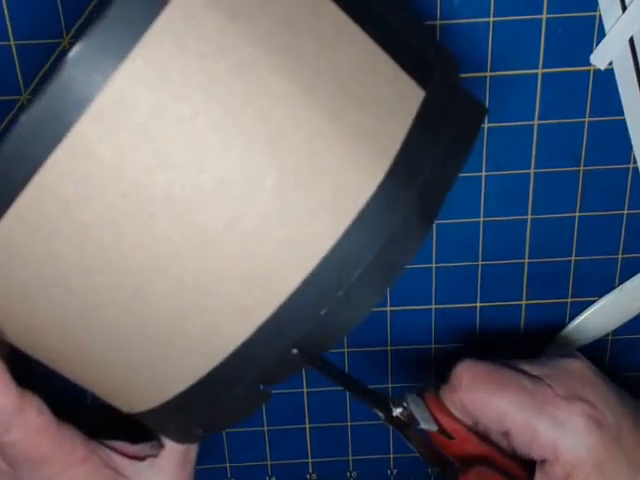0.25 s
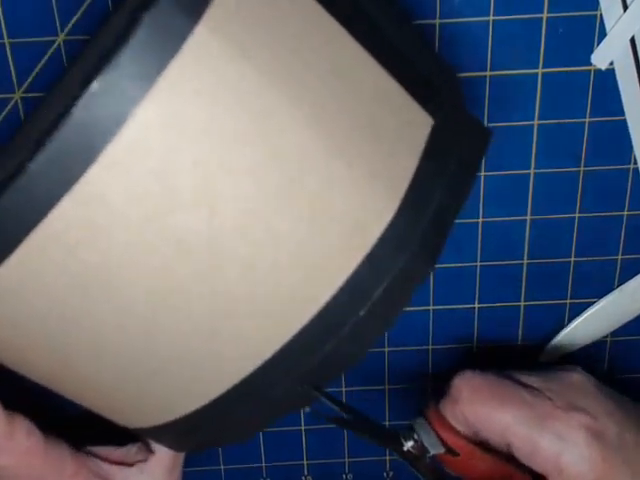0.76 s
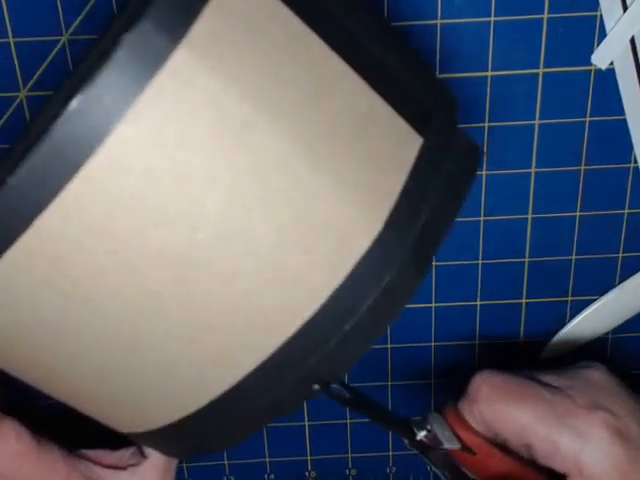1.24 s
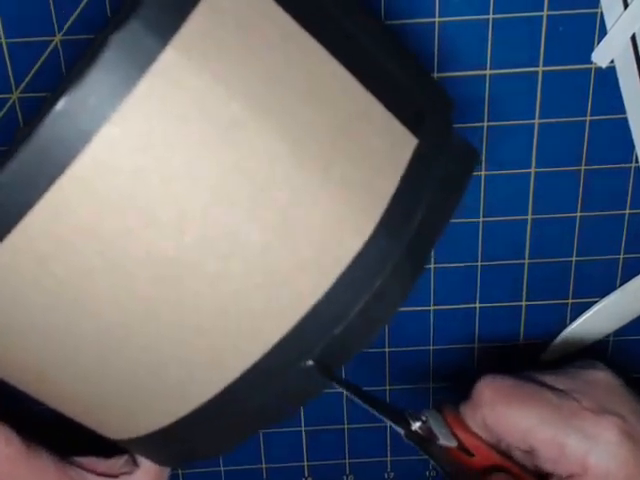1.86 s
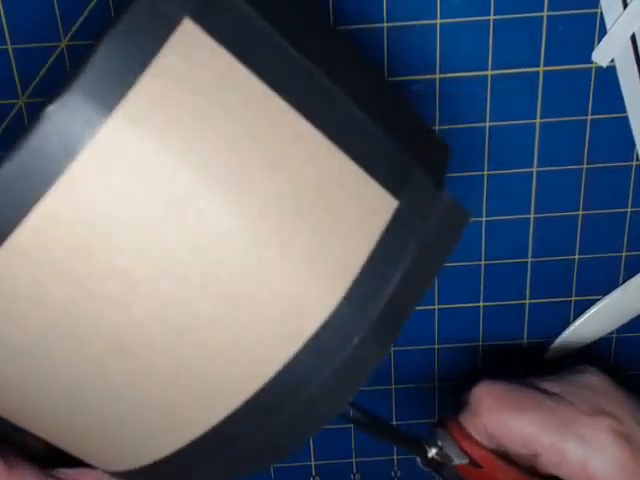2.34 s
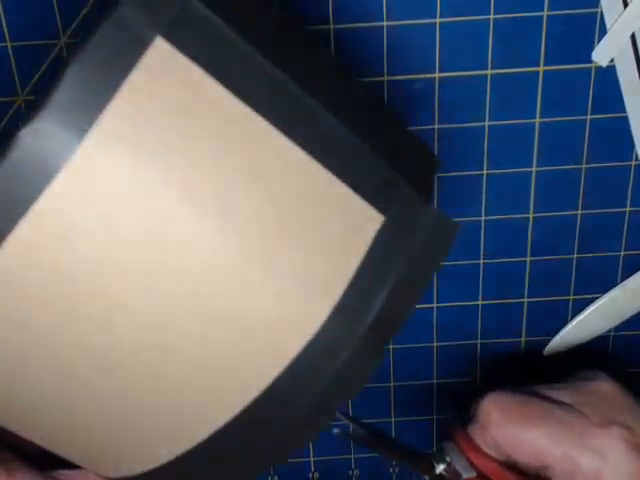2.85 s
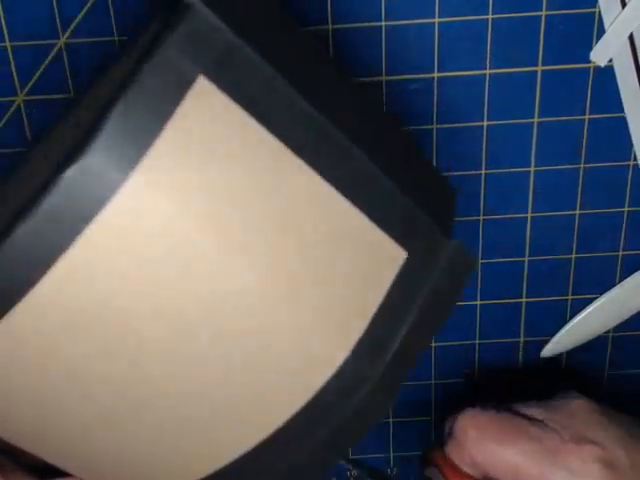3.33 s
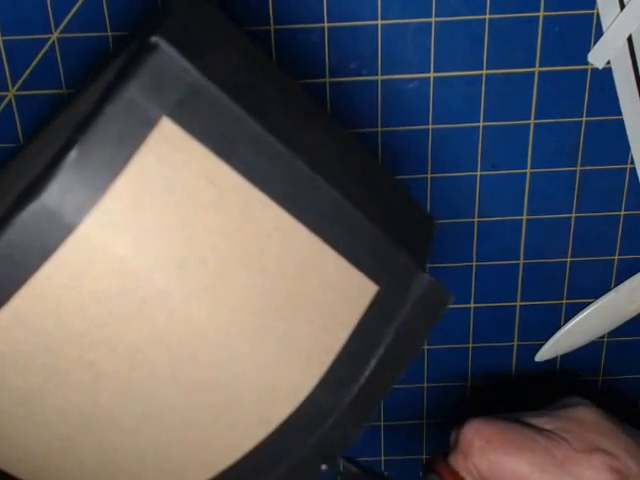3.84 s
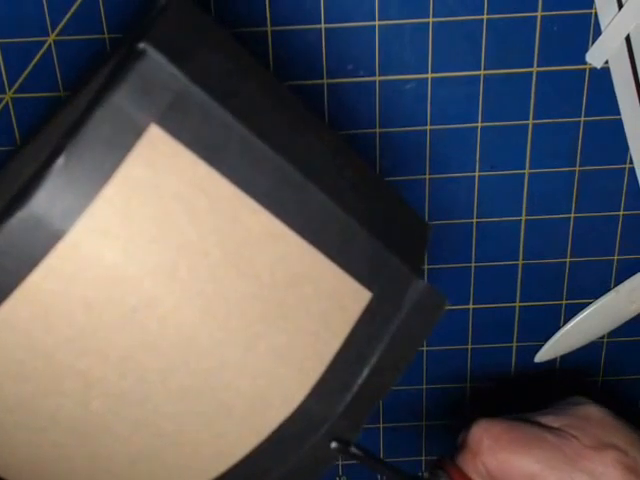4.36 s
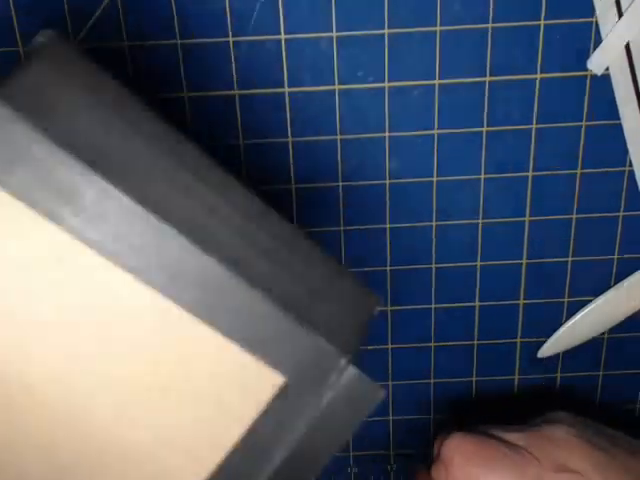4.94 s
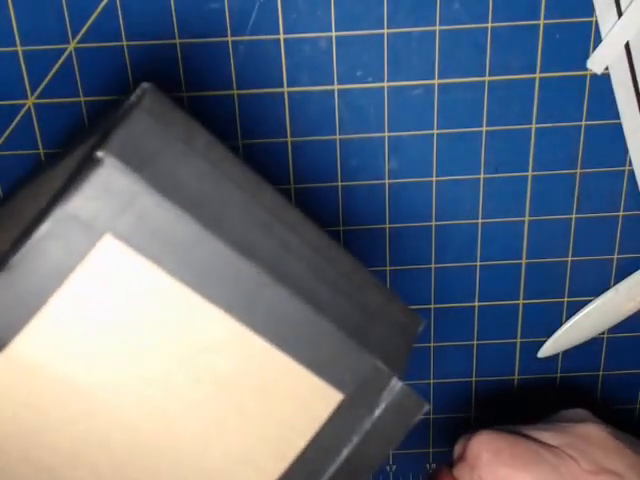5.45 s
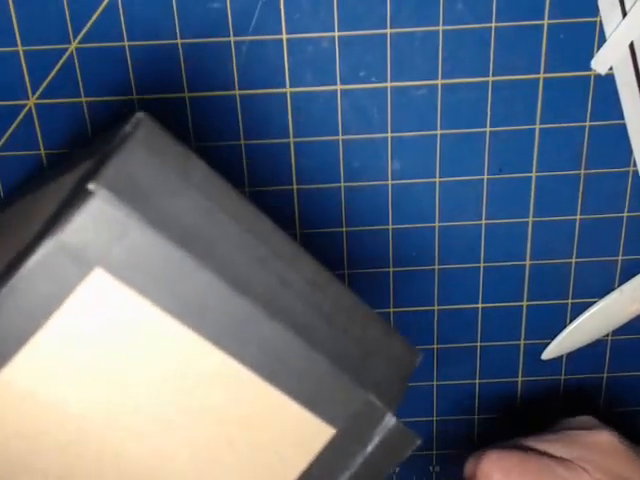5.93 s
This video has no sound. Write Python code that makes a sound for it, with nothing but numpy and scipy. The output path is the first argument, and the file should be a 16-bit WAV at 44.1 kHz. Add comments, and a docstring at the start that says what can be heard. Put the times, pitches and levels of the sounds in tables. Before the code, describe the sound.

A card box is trimmed with small scissors on a table. Each brief cut bites with a knock, crunches harder, then snaps through; the blades hiss apart and clatter metallically. Soft rubs, papery ticks and hollow bumps fill the gaps, busiest before the fourth and fifth cuts. The sound is close and slightly dull on top, with short reflections, light room noise and spells of faint rumble.

```python
"""Trimming a card box with small scissors

Close to a narrow-band microphone in a small room, five snips crunch through the card over a cutting mat.
Random fibre snaps shake card resonances, and each break-through snaps and knocks the box.
The blades then slide open as fine-grained friction and clack as a blow on the steel's resonances.
Between the cuts, fingers shift the box: slips groan in its walls, soft pushes knock it and the edge crackles.
Behind lie coloured room noise, a faint hum, spells of rumble and decaying-noise reflections."""
import sys
import numpy as np
from scipy import signal
from scipy.fft import rfft, irfft, next_fast_len
from scipy.io import wavfile
from scipy.ndimage import uniform_filter1d

SR = 44100
rng = np.random.default_rng(int(sys.argv[2]) if len(sys.argv) > 2 else 0)


def persist_wave(psi):
    """Save psi, clipped to +-1, as 16-bit WAV."""
    counts = np.round(np.clip(psi, -1, 1) * 32767).astype(np.int16)
    wavfile.write(sys.argv[1], SR, np.atleast_2d(counts).T)


N = 272977
TIME = np.arange(N) / SR
BLOW_TIME = TIME[:SR // 5]
LEAD_S = .01  # room ahead of each blow for the surfaces to graze
RUB_ATTACK_SHARE = 0.3  # share of a rub or crackle that lies before its crest

# The five snips: bite, crunch and break-through. Each row: bite in seconds, its level in dB, its pitch in Hz,
# crunch start in seconds, its level in dB, its treble in dB, groan of the wall in dB,
# break-through in seconds, snap in dB, knock in dB, knock pitch in Hz, low thud in dB,
# ring of the cut strip in Hz, ring of the loaded edge in Hz.
SNIPS = [(0.5206, -29, 651, .526, -38.5, -5, -46.5, .5735, -28.5, -24, 631, -5, 2473, 6640),
         (1.730, -32, 684, 1.742, -41.5, -7, -47.5, 1.8125, -28.5, -31, 649, -12, 2790, 6620),
         (3.063, -45.5, 1164, 3.101, -40.5, 0.5, -46, 3.1385, -30.5, -29.5, 847, -5, 2190, 5246),
         (4.533, -33, 1246, 4.542, -40, -3, -39.5, 4.5912, -23, -31, 696, -1, 1300, 6060),
         (5.69, -37, 1150, 5.700, -46, -1, -44.5, 5.7570, -21.5, -36, 953, 5.5, 3670, 7100)]
# Resonances of the scissors. Each row: pitch in Hz, width in Hz, level in dB.
SCISSOR_MODES = [(516, 250, -7), (868.4, 270, -3.5), (1100, 120, -5), (1946, 210, 0), (2330, 160, -2),
                 (2960, 270, -3), (3206, 450, -1.5), (3700, 310, -3.5), (4600, 250, -14.5),
                 (4920, 160, -4.5), (5780, 320, -7), (7500, 1300, -6.5)]


def from_db(db):
    """Turn decibels into an amplitude factor."""
    return 10 ** (np.asarray(db) / 20)


def rms_one(x):
    """Scale a sound to rms 1."""
    return x / np.sqrt(np.mean(x ** 2) + 1e-20)


def blow_one(x):
    """Scale a blow to the energy of 3 ms at level 1."""
    return x / np.sqrt(np.sum(x ** 2) / (.003 * SR) + 1e-20)


def at_hz(points, hz):
    """Read a table on a log-frequency axis."""
    points = np.array(points)
    return np.interp(np.log(np.maximum(hz, 1)), np.log(points[:, 0]), points[:, 1])


def add(out, s, sound):
    """Mix a sound in at a given time."""
    start = max(round(s * SR), 0)
    out[start:start + len(sound)] += sound[:N - start]


def cut(x, hz, kind, order=2):
    """Butterworth filter."""
    return signal.sosfilt(signal.butter(order, hz, kind, fs=SR, output="sos"), x)


def resonate(x, hz, width_hz):
    """One resonance, gain 1 on top."""
    r = np.exp(-np.pi * width_hz / SR)
    zeros = np.array([1, 0, -1]) * (1 - r * r) / 2
    poles = [1, -2 * r * np.cos(2 * np.pi * hz / SR), r * r]
    return signal.lfilter(zeros, poles, x + 1e-18)


def body(x, modes):
    """Parallel resonances with alternating signs."""
    return sum((-1) ** k * from_db(db) * resonate(x, hz, width) for k, (hz, width, db) in enumerate(modes))


def drift(rate):
    """Smooth chance, changing about so many times a second; spread 1."""
    steps = rng.standard_normal(4000)
    return rms_one(np.interp(TIME * rate, np.arange(len(steps)), steps))


def shifting_body(x, modes, shift_db, shifts_per_s):
    """The contact point travels, so each resonance is fed now more, now less."""
    out = np.zeros(N)
    for k, (hz, width, db) in enumerate(modes):
        feed = from_db(db + shift_db * drift(shifts_per_s))
        out += (-1) ** k * feed * resonate(x, hz, width)
    return out


def colour(x, spectrum):
    """Give a steady noise a spectrum; rms 1."""
    size = next_fast_len(N)
    hz = np.arange(size // 2 + 1) * SR / size
    return rms_one(irfft(rfft(x, size) * from_db(at_hz(spectrum, hz)), size)[..., :N])


def grains(per_s, spread_db):
    """Tiny slips or fractures at random moments with random signs, uneven in size unless the spread is 0."""
    sizes = from_db(spread_db * np.minimum(rng.exponential(1, N), 4)) * rng.choice([-1, 1], N)
    return sizes * (rng.random(N) < per_s / SR)


def even(x, window_s):
    """Hold the running level near 1 and keep the fine grain; a floor spares the quietest stretches."""
    power = uniform_filter1d(x ** 2, max(int(window_s * SR), 2))
    return x / np.sqrt(np.maximum(power, 0) + np.mean(x ** 2) / 10 ** 2)


def stroke(start, crest, end, depth_db):
    """Samples and gain of a movement that swells and dies away."""
    span = slice(int(start * SR), int(end * SR))
    away = np.abs(np.interp(TIME[span], [start, crest, end], [-1, 0, 1]))
    return span, from_db(-depth_db * away ** 1.13) * np.minimum(1, 10 * (1 - away))


def contact(chatter, build_s, t60):
    """A blow at LEAD_S: the surfaces graze as they meet, hit once, and chatter to rest."""
    t = BLOW_TIME - LEAD_S
    force = chatter * rng.standard_normal(len(t)) * from_db(-60 * np.maximum(-t / build_s, t / t60))
    force[round(LEAD_S * SR)] += 1
    return force


def pan(x, left_db):
    """Place a sound; left_db is the left channel's lead over the right."""
    return x * from_db([[left_db / 2], [-left_db / 2]])


def air(level_db=-68, side_db=-12, rumble_hz=55, rumble_width_hz=45, rumble_side_db=-10, waver_db=0.5):
    """Gently wavering room noise and a faint hum over a rumble that comes and goes."""
    # Room air. Each row: pitch in Hz, relative level in dB per Hz.
    air_spectrum = [(20, -37.5), (60, -25.5), (110, -13.5), (170, -1), (290, -3), (550, -7), (800, -11),
                    (1250, -17.5), (1600, -15), (2500, -16), (2800, -22.5), (3100, -31), (3450, -30.5),
                    (3700, -27), (4150, -27.5), (4550, -34), (5150, -29), (5600, -28.5), (6150, -32.5),
                    (6700, -27.5), (7400, -38.5), (9000, -41)]
    # Left-right difference of the air. Each row: pitch in Hz, dB against the middle (before rms scaling).
    side_tilt = [(80, -11.5), (250, -6.5), (700, -24), (2500, -20.5), (5000, -24)]
    # Spells of low rumble. Each row: start in seconds, end in seconds, level in dB.
    rumble_spells = [(1.459, 1.768, -81), (2.502, 4.499, -85)]
    # Faint steady hum and whine. Each row: pitch in Hz, level in dB.
    hum_tones = [(177.6, -87), (1717, -90), (2315, -90.5), (3628, -88.5), (4118, -96)]
    rumble_fade_s, rumble_rest_db = 0.16, -107
    opposite = np.array([[1], [-1]])

    mid = colour(rng.standard_normal(N), air_spectrum) * from_db(waver_db * drift(8.3))
    side_spectrum = [(hz, db + at_hz(side_tilt, hz)) for hz, db in air_spectrum]
    side = colour(rng.standard_normal(N), side_spectrum)
    noise = from_db(level_db) * (mid + from_db(side_db) * side * opposite)

    deep = resonate(rng.standard_normal((2, N)), rumble_hz, rumble_width_hz)
    low_mid, low_side = rms_one(cut(deep, 90, "low"))
    swell = from_db(rumble_rest_db)
    for start, end, db in rumble_spells:
        inside = np.minimum(TIME - start, end - TIME)
        swell = swell + from_db(db) * np.clip(1 + inside / rumble_fade_s, 0, 1)
    rumble = swell * (low_mid + from_db(rumble_side_db) * low_side * opposite)

    hum = sum(from_db(db) * np.sqrt(2) * np.sin(2 * np.pi * hz * TIME) for hz, db in hum_tones)
    return noise + rumble + hum


def room(x, near_db=-12, near_t60=0.055, far_db=-15, box_db=3, box_hz=900):
    """Quick reflections off table and box, then the room's tail, as noise decaying at its own rate in each band."""
    # Room reverberation time. Each row: pitch in Hz, time to fall by 60 dB in seconds.
    tail_t60 = [(150, 1), (500, 1), (1200, 0.34), (2600, 0.14), (4500, 0.22), (7000, 0.041)]
    # Strength of the room tail. Each row: pitch in Hz, level in dB.
    tail_level = [(150, -1), (600, -17), (1400, -5), (2500, 3), (4200, -7.5), (7000, -12.5)]
    # Left-right difference in reflected sound. Each row: pitch in Hz, level in dB.
    spread = [(80, -8), (300, -14), (700, -4), (1500, -7), (2700, -15), (7000, -18)]
    t, response = TIME[:SR // 2], 0
    edges = np.geomspace(80, 10000, 9)
    for low, high in zip(edges, edges[1:]):
        hz = np.sqrt(low * high)
        near = from_db(-60 * t / near_t60) * (t > .003)
        near *= from_db(near_db + box_db * (hz < box_hz)) / np.linalg.norm(near)
        far = from_db(-60 * t / at_hz(tail_t60, hz)) * (t > .006)
        far *= from_db(far_db + at_hz(tail_level, hz)) / np.linalg.norm(far)
        noise = rng.standard_normal((2, len(t))) * np.hypot(near, far)
        response = response + cut(noise, [low, high], "band") * from_db([[0], [at_hz(spread, hz)]])
    mid, side = signal.fftconvolve(x[None], response, axes=1)[:, :N]
    return mid + side * [[1], [-1]]


def all_rubs():
    """Rubs swell quickly and fade slowly; the wall also groans against the blades all through each snip."""
    # Card rubbing on fingers and blades. Each row: crest in seconds, length in seconds, crest level in dB,
    # pitch in Hz, dry rasp in dB.
    rub_rows = [(0.243, 0.057, -43.5, 676, -36), (0.381, 0.053, -53.5, 850, -14),
                (0.705, 0.047, -50, 668, 4), (1.36, 0.16, -48.5, 660, -27), (2.632, 0.042, -49, 860, -21.5),
                (2.918, 0.089, -50, 610, -14), (3.304, 0.067, -48, 746, -8.5),
                (3.8, 0.066, -40.5, 693, -22), (3.825, 0.049, -41.5, 694, -2.5),
                (3.846, 0.068, -43.5, 652, -28), (3.892, 0.05, -39, 682, -25),
                (3.921, 0.064, -49, 660, -5.5), (4.153, 0.14, -50, 640, -17), (4.266, 0.057, -54, 613, -13),
                (4.528, 0.031, -36, 853, -3.5), (4.703, 0.048, -38, 1375, -19.5),
                (5.171, 0.036, -45, 664, -9), (5.228, 0.19, -49, 595, -22.5), (5.328, 0.058, -49, 716, -27),
                (5.545, 0.054, -54.5, 735, -25), (5.582, 0.04, -44, 716, -25.5),
                (5.653, 0.051, -50.5, 656, -33), (5.684, 0.044, -41.5, 842, -13.5),
                (5.904, 0.072, -46, 1273, -25)]
    groan_hz, groan_rasp_db, groan_crest_share = 753, -8.5, 0.75
    groan_lead_s, groan_tail_s = 0.037, 0.041
    rows = []
    for s, length, db, hz, rasp_db in rub_rows:
        start = s - RUB_ATTACK_SHARE * length
        rows.append((start, s, s + (1 - RUB_ATTACK_SHARE) * length, db, hz, rasp_db))
    for bite, _, _, _, _, _, db, through, *_ in SNIPS:
        crest = bite + groan_crest_share * (through - bite)
        rows.append((bite - groan_lead_s, crest, through + groan_tail_s, db, groan_hz, groan_rasp_db))
    return rows


def rubs(slips_per_s=900, crackles_per_s=300, width_share=0.27, skirt_share=0.65, judder_db=2.5,
         overtone=1.7, overtone_db=-11):
    """Stick and slip make a wall groan in short swells at its own pitch, with a dry rasp from the card's surface."""
    # Resonances of the rubbed card surface. Each row: pitch in Hz, width in Hz, level in dB.
    rasp_modes = [(1170, 220, 7), (1500, 260, 7), (2420, 170, 4), (2980, 260, 0), (5360, 250, -15),
                  (6220, 260, -14)]
    out = np.zeros(N)
    slips = cut(grains(slips_per_s, spread_db=2.0), 230, "high")
    snags = cut(grains(crackles_per_s, spread_db=4.5), 260, "high")
    surface = rms_one(slips) + rms_one(snags)
    rasp = rms_one(shifting_body(surface, rasp_modes, shift_db=3, shifts_per_s=50))
    judder = from_db(judder_db * drift(170))
    for start, crest, end, db, hz, rasp_db in all_rubs():
        span, gain = stroke(start, crest, end, depth_db=25.0)
        wall = 0
        for pitch, level in [(hz, 0), (overtone * hz, overtone_db)]:
            peak = resonate(slips[span], pitch, width_share * hz)
            wall = wall + from_db(level) * resonate(peak, pitch, skirt_share * hz)
        groan = judder[span] * even(wall, window_s=0.014)
        out[span] += from_db(db) * gain * (groan + from_db(rasp_db) * rasp[span])
    return out


def crackles(ticks_per_s=700, width_hz=700):
    """A short flurry of tiny, bright ticks as the paper's edge bends."""
    # Dry crackles of the edge under the fingers. Each row: crest in seconds, length in seconds,
    # crest level in dB, pitch in Hz.
    crackle_rows = [(0.246, 0.084, -73, 4170), (0.247, 0.052, -72.5, 6740), (0.376, 0.09, -65, 2130),
                    (0.383, .05, -71.5, 6600), (2.629, 0.033, -67.5, 4100), (2.630, 0.022, -69.5, 6390),
                    (2.737, 0.057, -75.5, 6660), (2.93, 0.041, -67.5, 7070), (3.674, 0.091, -74, 6120),
                    (4.041, .09, -75.5, 4220), (5.8297, 0.032, -53, 6960)]
    out, ticks = np.zeros(N), grains(ticks_per_s, spread_db=2.5)
    for s, length, db, hz in crackle_rows:
        start, end = s - RUB_ATTACK_SHARE * length, s + (1 - RUB_ATTACK_SHARE) * length
        span, gain = stroke(start, s, end, depth_db=23.0)
        ring = resonate(resonate(ticks[span], hz, width_hz), hz, 2 * width_hz)
        out[span] += from_db(db) * gain * rms_one(ring)
    return out


def all_knocks():
    """Besides the handling, every snip knocks the box as it bites and just after it breaks through."""
    # The card box is knocked or flexes. Each row: time in seconds, level in dB, pitch in Hz, low thud in dB.
    knock_rows = [(.106, -52, 546, -15), (.241, -39, 510, -41), (.380, -39.5, 800, -11.5),
                  (.383, -41, 392, -17.5), (.412, -57.5, 264, -7), (.978, -54, 650, -12),
                  (1.246, -45.5, 419, -1.5), (1.952, -32.5, 1100, -2), (2.6284, -39, 902, -23.5),
                  (2.767, -60, 682, -24), (2.912, -43.5, 874, -6), (2.925, -37.5, 564, -5),
                  (3.018, -56, 258.3, 1.5), (3.382, -31, 961, -1), (4.814, -31.5, 485, -33.5),
                  (5.161, -36, 427, 1), (5.1622, -36.5, 995, -7), (5.8305, -26, 936, -44),
                  (5.832, -32, 410, -22.5), (5.968, -40, 428, 2.5)]
    bite_thud_db = -16
    knock_lag_s = 0.0022  # from the break-through to the knock of the wall
    rows = list(knock_rows)
    for bite, bite_db, bite_hz, *_, through, _, knock_db, hz, thud_db, _, _ in SNIPS:
        rows.append((bite, bite_db, bite_hz, bite_thud_db))
        rows.append((through + knock_lag_s, knock_db, hz, thud_db))
    return rows


def knocks(thud_hz=234, thud_width_hz=55, deep_hz=120, deep_db=-8, deepening=3.2, panel_hz=420, panel_db=-2,
           flutter=0.1, softness=1.1, crackle_db=-15, wall_left_db=0.1, thud_left_db=-4):
    """A soft push and brief flutter drive a wall with a crackling surface; the box thuds, deeper when hit squarely."""
    out = np.zeros((2, N))
    for s, db, hz, thud_db in all_knocks():
        flutter_t60 = 20 / hz  # the flutter dies away over 20 cycles of the wall
        push = contact(flutter, build_s=.008, t60=flutter_t60)
        ring = resonate(resonate(push, hz, .35 * hz), hz, 2 * hz)
        wall = blow_one(cut(ring, softness * hz, "low"))
        surface = cut(resonate(push, 1800, 900), 2800, "low", order=4)
        knock = wall + from_db(crackle_db) * blow_one(surface)
        modes = [(thud_hz, thud_width_hz, 0),
                 (deep_hz, thud_width_hz, deep_db + deepening * thud_db),
                 (panel_hz, thud_width_hz, panel_db)]
        boom = cut(cut(body(push, modes), 410, "low"), 59, "high")
        thud = from_db(thud_db) * blow_one(boom)
        for channel, sound in zip(out, pan(knock, wall_left_db) + pan(thud, thud_left_db)):
            add(channel, s - LEAD_S, from_db(db) * sound)
    return out


def squeaks():
    """The dry pivot sticks and chirps: two partials swell for a few milliseconds as it slips."""
    # Each row: centre in seconds, level in dB, half length in seconds, lower partial in Hz,
    # upper partial in Hz, upper partial in dB against the lower.
    squeak_rows = [(4.792, -42, .002, 4220, 7050, -2), (4.802, -31, .003, 4220, 7050, -4),
                   (4.809, -34, .002, 4220, 7050, 5), (.5545, -40, .004, 3450, 7000, 4),
                   (.572, -39, .003, 2400, 6300, 5), (5.907, -34, .006, 1480, 5700, -26),
                   (5.9606, -20, .0011, 3000, 6250, -3)]
    out = np.zeros(N)
    for s, db, half, lower_hz, upper_hz, upper_db in squeak_rows:
        t = TIME[:int(6 * half * SR)]
        lower = np.sin(2 * np.pi * lower_hz * t)
        upper = from_db(upper_db) * np.sin(2 * np.pi * upper_hz * t)
        swell = np.exp(-((t - t.mean()) / half) ** 2)
        add(out, s - len(t) / SR / 2, from_db(db) * (lower + upper) * swell)
    return out


def clacks(chatter=0.22, body_hz=1400, treble_hz=4500, handle_width_hz=170, direct_db=-16, low_hz=260):
    """A hard contact and a few milliseconds of chatter ring the scissors; the free blades ring on faintly."""
    # Steel snapping to a stop; grip and opening decide where it rings. Each row: time in seconds,
    # level in dB, brightness in dB, handle ring in Hz, its dB, blade ring in Hz, its dB, tip ring in Hz,
    # lingering ring in Hz, its dB.
    clack_rows = [(0.837, -35, 8, 1840, -4.5, 4550, 0.5, 6880, 1950, -13),
                  (0.85, -14.5, 10, 1157, 10, 4520, 5.5, 7023, 1235, 9.5),
                  (0.8513, -21.5, -2.5, 576, 5, 3590, 3.5, 6630, 1913, 8),
                  (1.9250, -24.5, 7.5, 895, 12.5, 3124, 12.5, 6800, 1310, -10.5),
                  (1.938, -30.5, 9, 1214, -1, 5470, 1, 6850, 1313, -6),
                  (1.9498, -19.5, -16.5, 1120, 3.5, 2950, 1, 6340, 1280, 7),
                  (1.962, -24, 3, 808, -4, 2240, 7, 6380, 2474, 4),
                  (1.9658, -37, 2.5, 1092, -1, 4300, 2.5, 6180, 2548, -5.5),
                  (2.151, -36.5, 1.5, 1516, 15.5, 2800, 2.5, 6490, 1600, -1),
                  (3.3648, -37.5, 11, 5014, 3.5, 4075, -5, 6640, 2174, -6.5),
                  (3.379, -14, 2.5, 1004, 1, 3170, 5, 6294, 2123, 1.5),
                  (4.7159, -25, -14.5, 1244, 0, 2903, 4.5, 6800, 2900, 7),
                  (4.8118, -17, -1.5, 833, 8, 3350, 15.5, 6880, 2060, 2.5),
                  (5.951, -49.5, 12, 4750, 15, 2694, -4.5, 6760, 2000, -9),
                  (5.9674, -14.5, -2, 495, -0.5, 3220, 8, 6300, 1270, 3.5)]
    # Brief, faint ring of the free blades. Each row: multiple of the lingering pitch, width in Hz,
    # level in dB ahead of the lingering ring's own dB.
    blade_ring = [(1, 21, -1), (1.05, 30, -5), (1.13, 34, -9), (1.56, 26, -7)]
    low_modes_db, thinning = -4, 0.22  # the low modes lose this share of the brightness
    tip_db, tip_width_hz, blade_width_hz = 7, 480, 330
    out = np.zeros(N)
    for s, db, treble_db, handle_hz, handle_db, blade_hz, blade_db, tip_hz, linger_hz, linger_db in clack_rows:
        body_db = low_modes_db - thinning * treble_db
        force = contact(chatter, build_s=.003, t60=.014)
        modes = [(hz, width, level + body_db * (hz < body_hz) + treble_db * (hz > treble_hz))
                 for hz, width, level in SCISSOR_MODES]
        gripped = [(handle_hz, handle_width_hz, handle_db), (blade_hz, blade_width_hz, blade_db)]
        tip = resonate(resonate(force, tip_hz, tip_width_hz), tip_hz, 2 * tip_width_hz)
        free = [(multiple * linger_hz, width, level + linger_db) for multiple, width, level in blade_ring]
        ring = body(force, modes + gripped) + from_db(tip_db + treble_db) * tip + body(force, free)
        clack = cut(ring + from_db(direct_db) * force, low_hz, "high")
        add(out, s - LEAD_S, from_db(db) * blow_one(clack))
    return out


def sliding(slips_per_s=4500, split_hz=3500, ring_db=-2, release_s=0.041):
    """Edge scrapes on edge with a fine-grained hiss that wakes the resonances of the scissors."""
    # Blades sliding over each other. Each row: crest in seconds, rise in seconds, crest level in dB,
    # treble tilt in dB.
    slide_rows = [(0.709, 0.044, -47.5, 8), (0.852, 0.061, -41.5, 8.5), (1.957, 0.06, -32.5, 2.5),
                  (2.163, 0.026, -43, 5.5), (3.296, 0.05, -47, -12), (3.381, 0.05, -39.5, 5.5),
                  (4.711, 0.039, -36.5, 2.5), (4.814, 0.022, -32, 6.5), (5.841, 0.02, -44, -19),
                  (5.908, 0.027, -47, 29), (5.967, 0.024, -31.5, -1)]
    # Blade friction. Each row: pitch in Hz, relative level in dB per Hz.
    friction = [(100, -19), (400, -3), (800, -2), (1400, -1), (2300, -4.5), (3200, -12), (4200, -3),
                (5000, -2), (5800, -2), (7000, -8), (9000, -13.5)]
    out, slips = np.zeros(N), grains(slips_per_s, spread_db=2.0)
    steel = shifting_body(slips, SCISSOR_MODES, shift_db=4, shifts_per_s=50)
    bare = rms_one(grains(slips_per_s, spread_db=2.0))
    scrape = colour(bare + from_db(ring_db) * rms_one(steel), friction)
    for crest, rise, db, tilt_db in slide_rows:
        span, gain = stroke(crest - rise, crest, crest + release_s, depth_db=27.5)
        treble = cut(scrape[span], split_hz, "high", order=1)
        hiss = scrape[span] + (from_db(tilt_db) - 1) * treble
        out[span] += from_db(db) * gain * even(hiss, window_s=0.036)
    return out


def snaps_through(chatter=0.12, low_hz=420, travel_s=0.0032, dull_hz=878):
    """The last fibres part at once; the card carries the treble faster than the bass, so the snap sweeps down."""
    out, hz = np.zeros(N), np.fft.rfftfreq(len(BLOW_TIME), 1 / SR)
    # travel_s is the time a 1 kHz bending wave takes to cross the card; dull_hz is where the snap weakens
    travel = np.exp(-4j * np.pi * travel_s * np.sqrt(1000 * hz))
    for through, db in (row[7:9] for row in SNIPS):
        force = contact(chatter, build_s=.003, t60=.012)
        snap = cut(cut(force, low_hz, "high"), dull_hz, "low", order=1)
        wave = irfft(rfft(snap) * travel, len(force))
        add(out, through - LEAD_S, from_db(db) * blow_one(wave))
    return out


def cutting_force(rise_db=17.5, release_db_per_s=1408):
    """Body and treble strength of the crunch: it grows until the break-through and lets go; cracks stand out."""
    # Tough fibres give way in a crack of their own. Each row: time in seconds, level in dB, treble in dB,
    # half length in seconds.
    crack_rows = [(0.5453, -35, -11, 0.0022), (0.557, -32.5, 4.5, 0.003), (0.5705, -36.5, 1, 0.00089),
                  (1.778, -46, -3.5, 0.0023), (1.804, -49, 12, 0.0067), (1.813, -38.5, 1, 0.0036),
                  (3.1015, -39.5, -10, 0.0018), (3.104, -40.5, -20, 0.0021), (3.12, -36, 1.5, 0.0037),
                  (3.1385, -31, -9, 0.0038), (4.5592, -33.5, -23, 0.0024), (4.572, -32, -14.5, 0.0012),
                  (4.5918, -25.5, -2.5, 0.0033), (5.716, -49, 4.5, 0.0029), (5.741, -31, -1.5, 0.0035),
                  (5.7566, -30, 7.5, 0.0022)]
    power = np.zeros((2, N))
    for s, db, treble_db, half in crack_rows:
        swell = np.exp(-np.minimum(((TIME - s) / half) ** 2, 60))
        power += from_db([[db], [db + treble_db]]) ** 2 * swell
    for _, _, _, start, db, treble_db, _, through, *_ in SNIPS:
        rise = rise_db * (np.maximum(through - TIME, 0) / (through - start)) ** 2
        fall = release_db_per_s * np.maximum(TIME - through, 0)
        gain = from_db(-np.minimum(rise + fall, 200))
        power += (from_db([[db], [db + treble_db]]) * gain) ** 2
    return np.sqrt(power)


def cutting(fibres_per_s=950, spread_db=0.0, low_hz=350, direct_db=-20, split_hz=3500, catch_db=-0.5):
    """Fibres snap in quick succession and shake card, strip and edge, harder as the blades close; the edge catches."""
    # Resonances of the cut card. Each row: pitch in Hz, width in Hz, level in dB.
    card_modes = [(426.2, 110, -0.5), (690, 430, 3), (1250, 87, -3), (1850, 500, -1.5), (2364, 20, 5),
                  (3055, 300, -1), (4140, 100, -3), (4918, 770, -5), (5730, 260, 0.5), (6000, 600, -6.5)]
    strip_width_hz, strip_db, edge_width_hz, edge_db = 160, 0, 250, -3
    out, snaps, force = np.zeros(N), grains(fibres_per_s, spread_db), cutting_force()
    card = shifting_body(snaps, card_modes, shift_db=3, shifts_per_s=60) + from_db(direct_db) * snaps
    for _, _, _, start, _, _, _, through, *_, strip_hz, edge_hz in SNIPS:
        span = slice(int((start - .05) * SR), int((through + .05) * SR))
        modes = [(strip_hz, strip_width_hz, strip_db), (edge_hz, edge_width_hz, edge_db)]
        crunch = cut(card[span] + body(snaps[span], modes), low_hz, "high")
        # body and treble are levelled apart, so the force alone shapes each
        halves = [even(cut(crunch, split_hz, kind, order=4), window_s=.008) for kind in ("low", "high")]
        out[span] = np.sum(force[:, span] * halves, axis=0)
    return from_db(catch_db * drift(350)) * out


def scene(cut_left_db=0.4, rub_left_db=1.8):
    """Scissors in the middle; cuts and wall knocks barely left, rubs and crackles further left, thuds to the right."""
    scissors = sliding() + clacks() + squeaks()
    cuts = pan(cutting() + snaps_through(), cut_left_db)
    handling = pan(rubs() + crackles(), rub_left_db)
    direct = scissors + cuts + handling + knocks()
    return direct + room(direct.mean(axis=0)) + air()


def record(dry, edge_hz=7170, leak_db=-29, cutoff_hz=8300):
    """The microphone thins the bass and lets only a faint edge past the top of its narrow band."""
    thin = cut(dry, 35, "high")
    narrow = signal.sosfiltfilt(signal.butter(36, edge_hz, fs=SR, output="sos"), thin)
    leaky = narrow + from_db(leak_db) * thin
    return signal.sosfiltfilt(signal.butter(16, cutoff_hz, fs=SR, output="sos"), leaky)


dry = scene()
out = record(dry)
persist_wave(out)
```